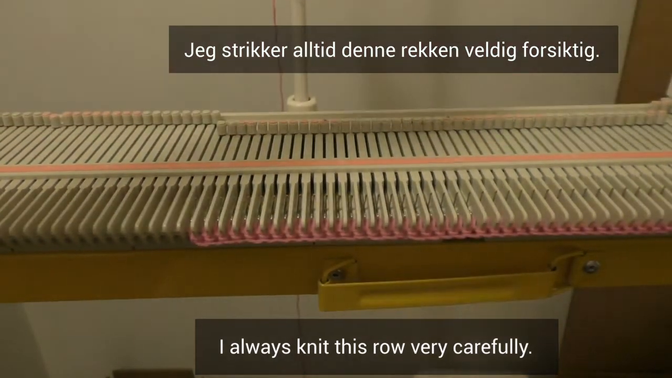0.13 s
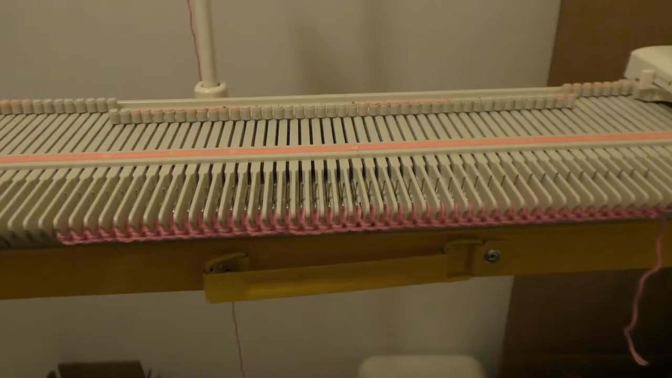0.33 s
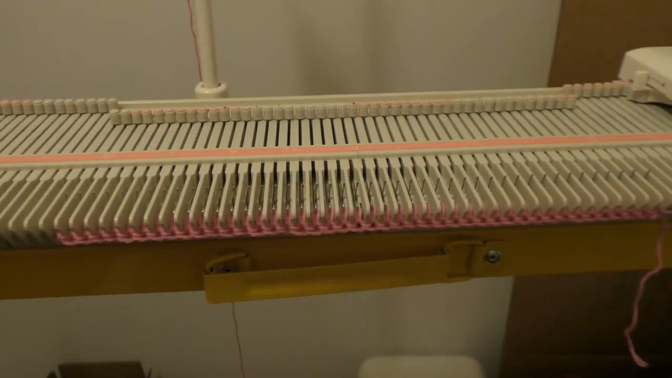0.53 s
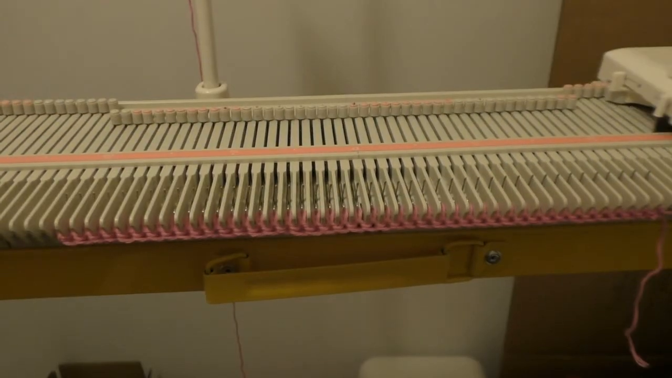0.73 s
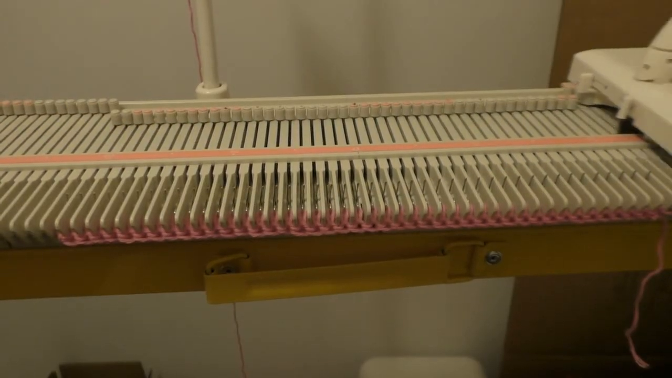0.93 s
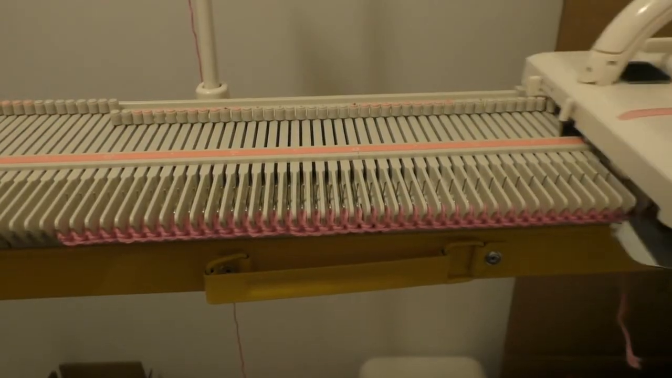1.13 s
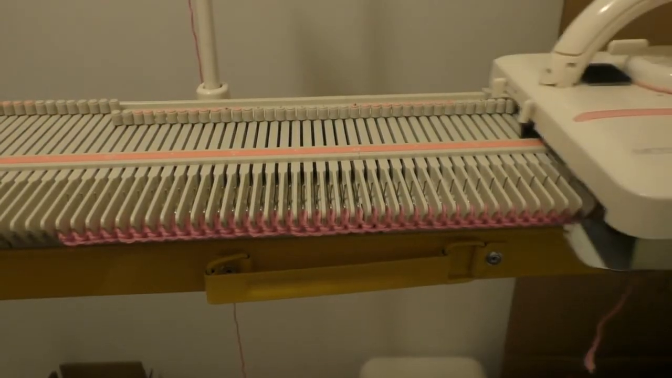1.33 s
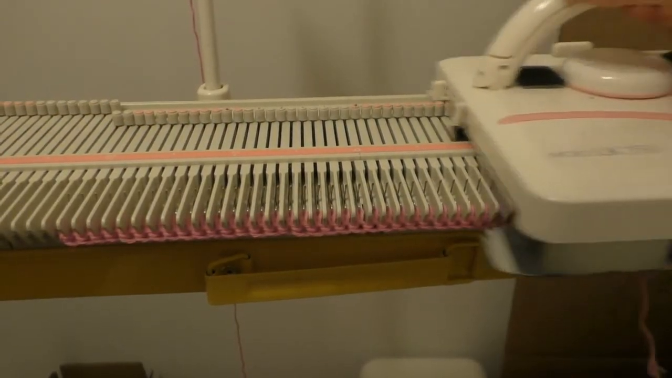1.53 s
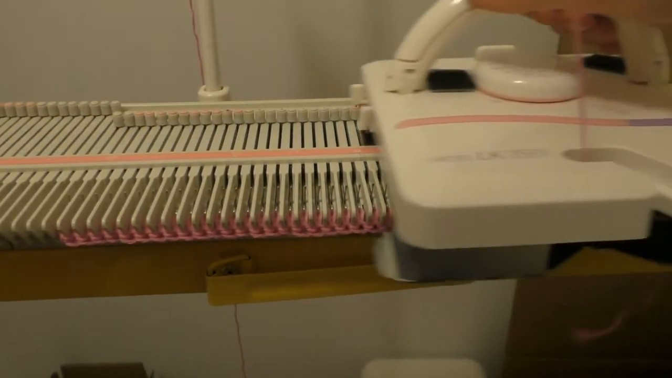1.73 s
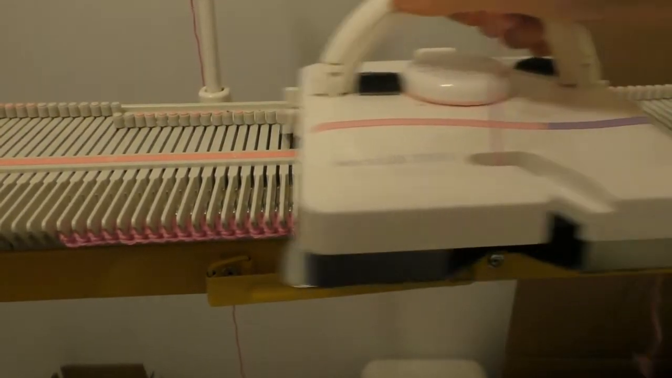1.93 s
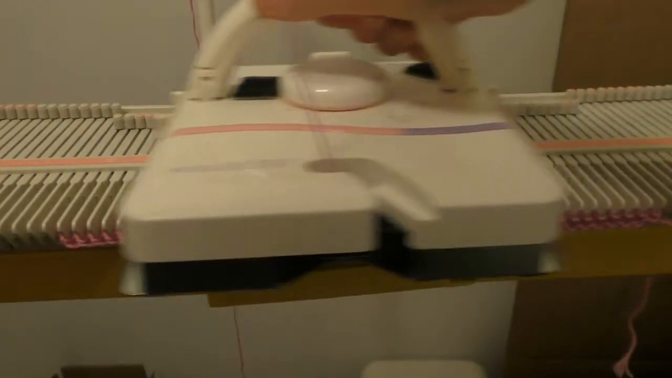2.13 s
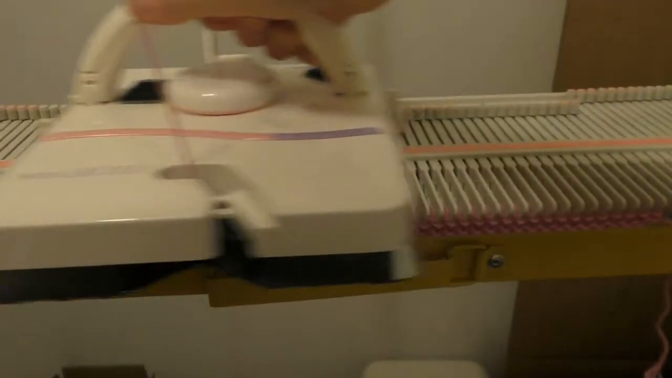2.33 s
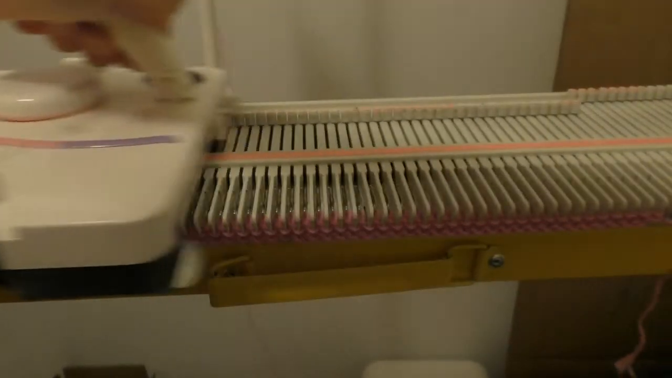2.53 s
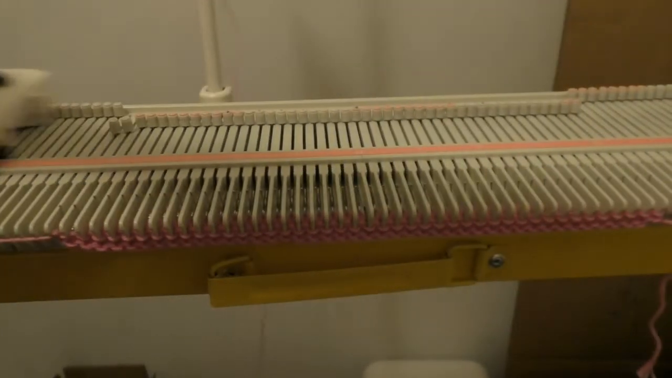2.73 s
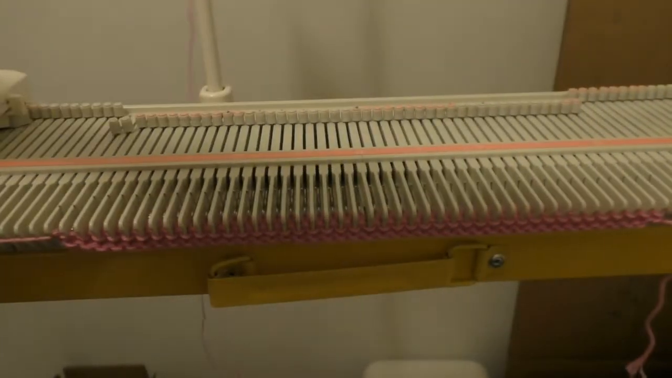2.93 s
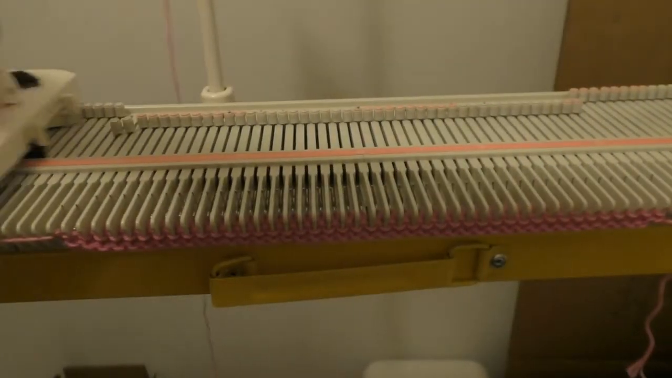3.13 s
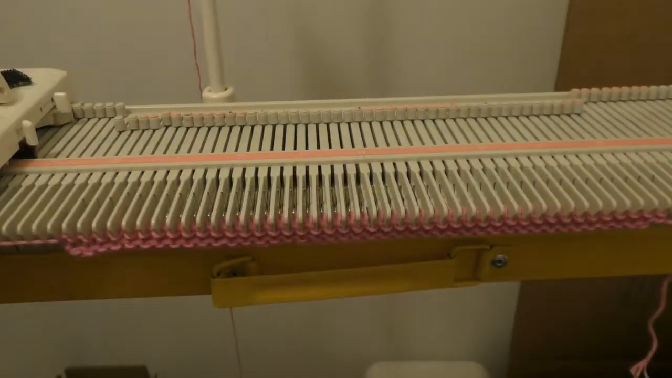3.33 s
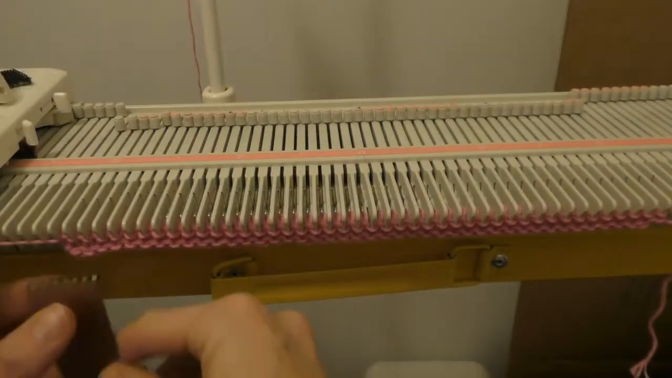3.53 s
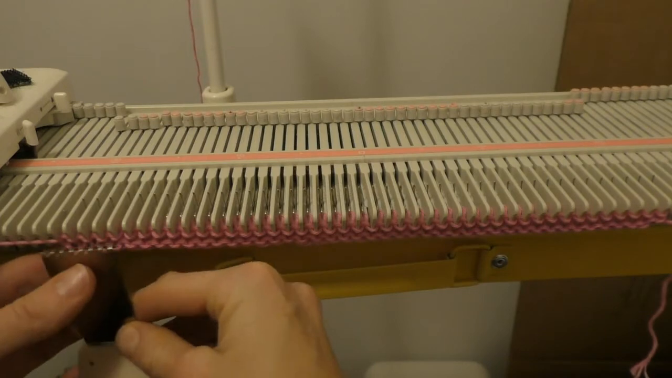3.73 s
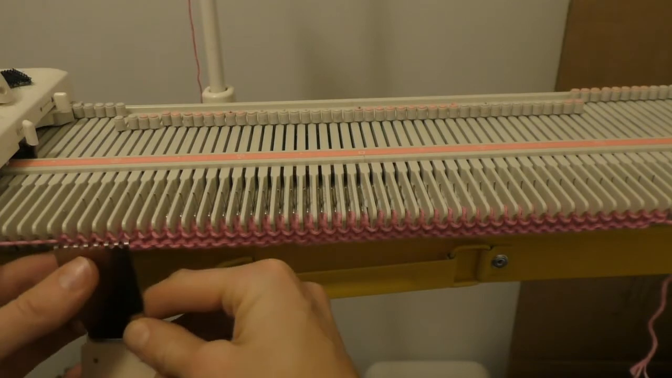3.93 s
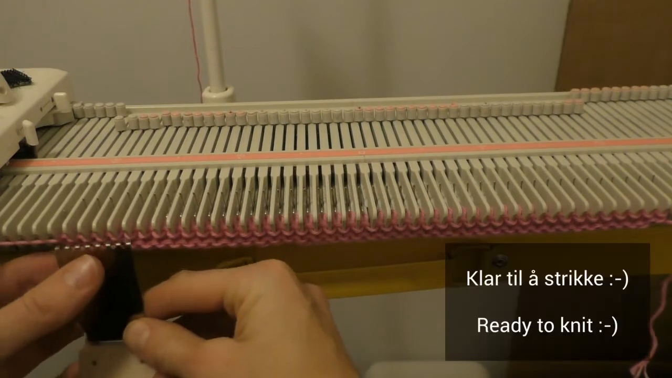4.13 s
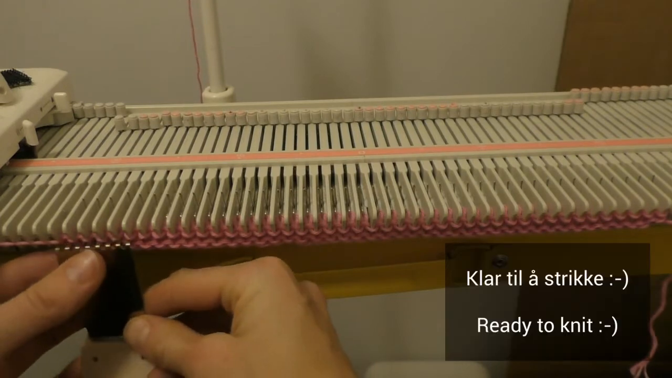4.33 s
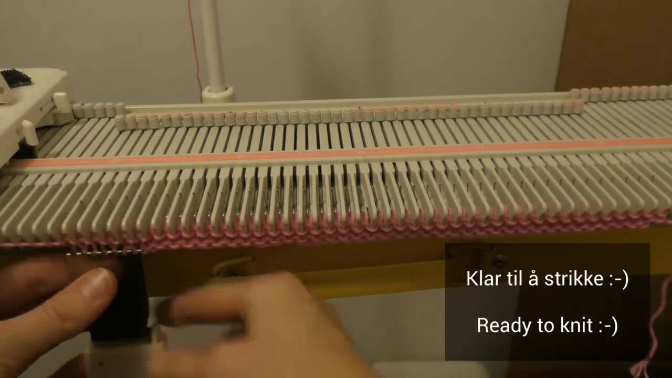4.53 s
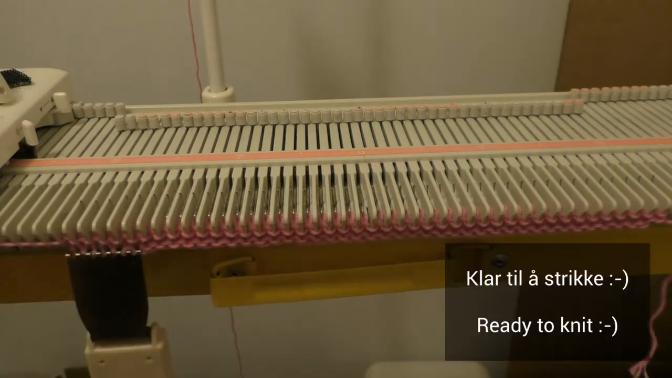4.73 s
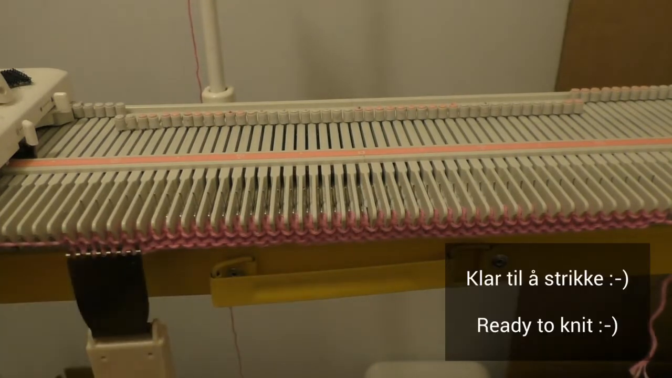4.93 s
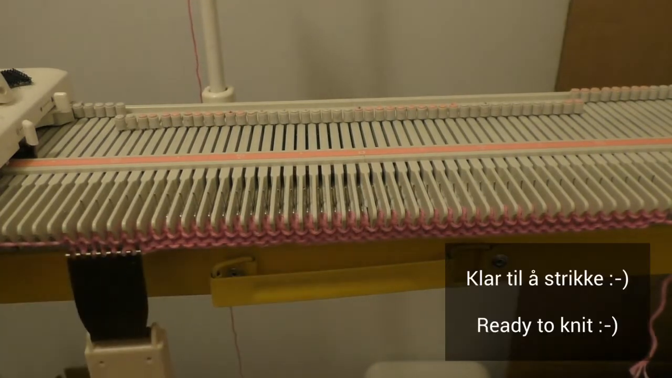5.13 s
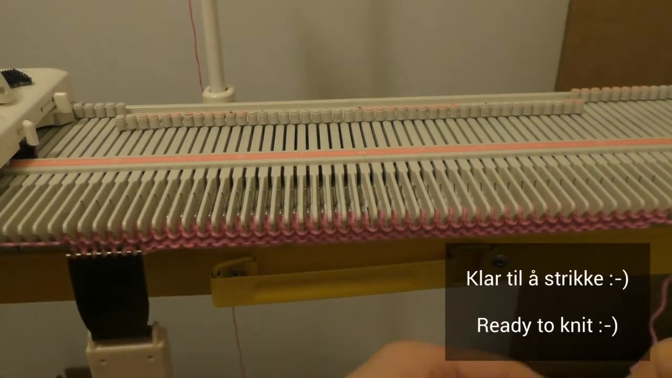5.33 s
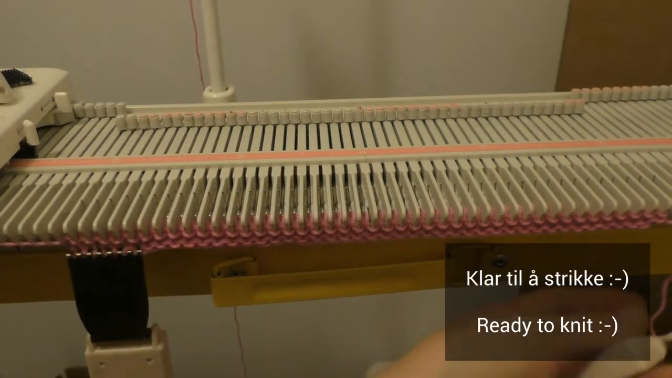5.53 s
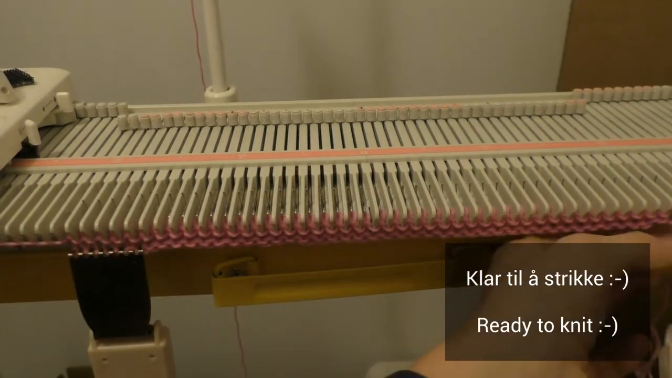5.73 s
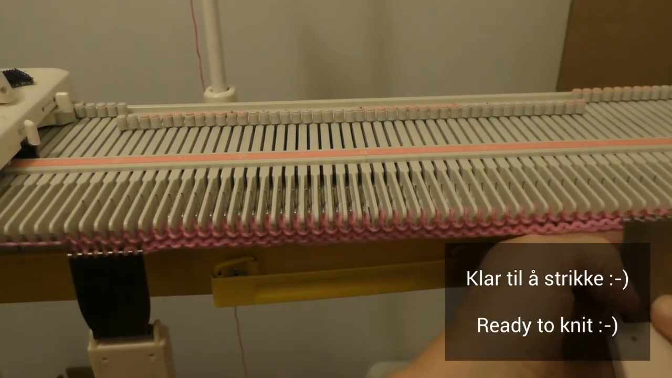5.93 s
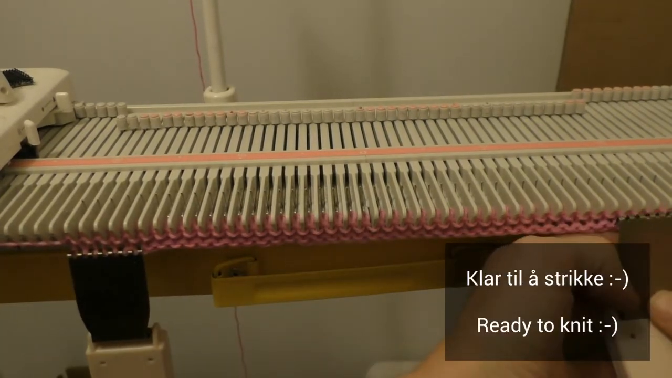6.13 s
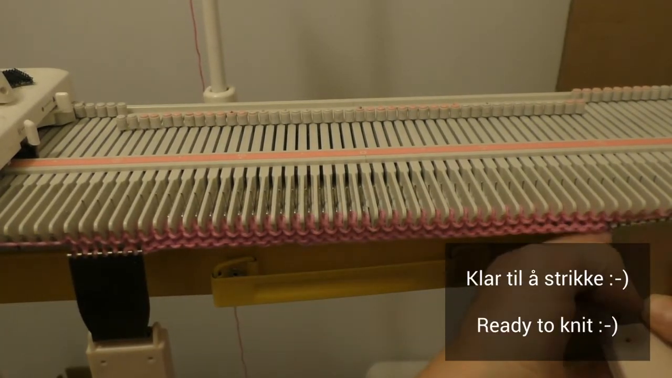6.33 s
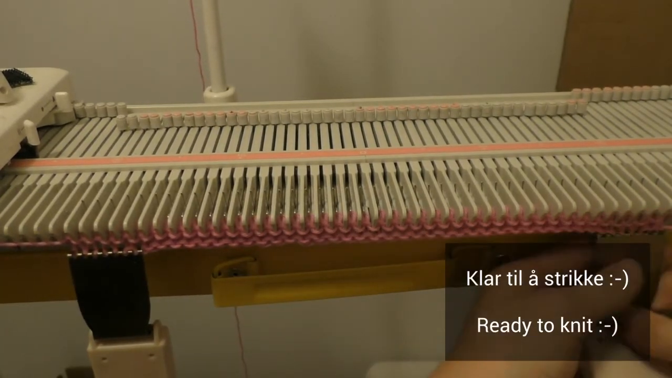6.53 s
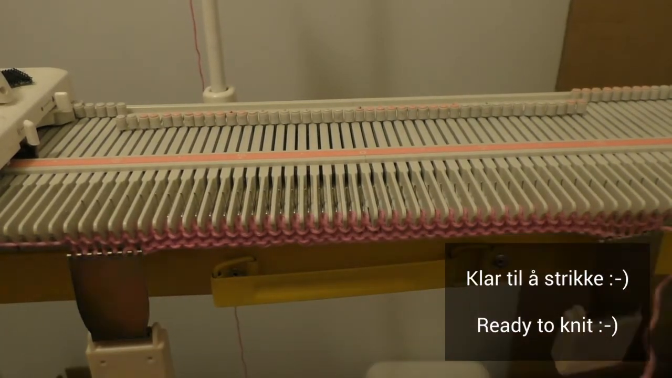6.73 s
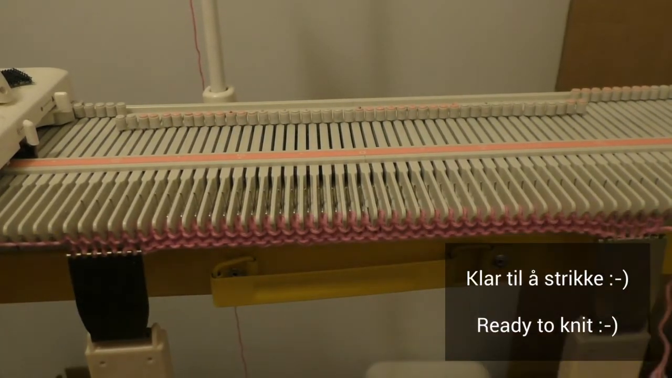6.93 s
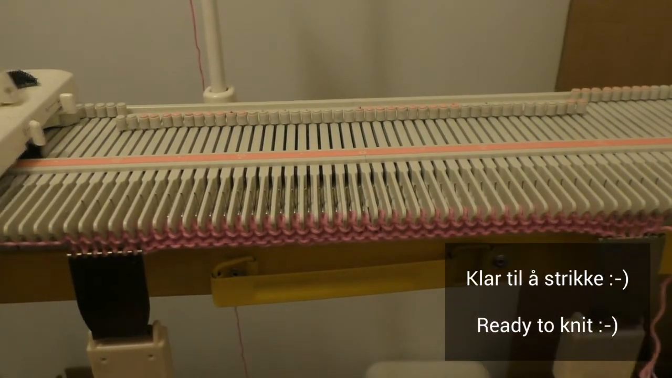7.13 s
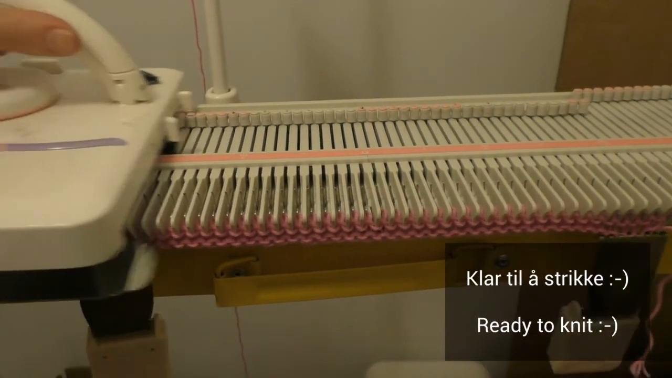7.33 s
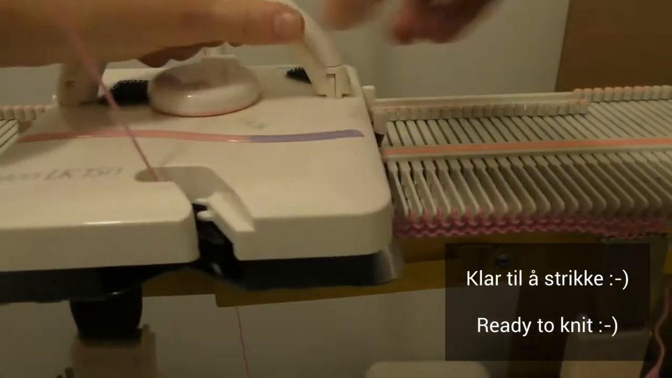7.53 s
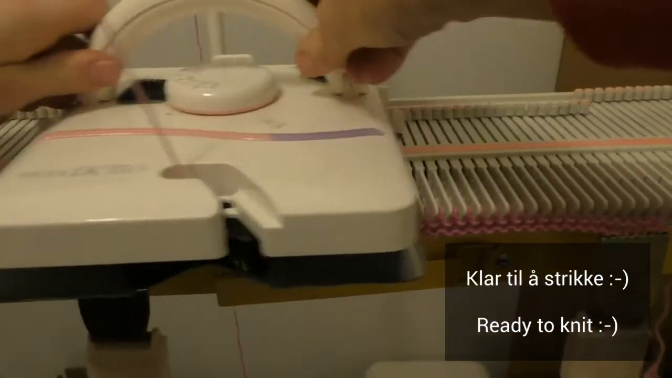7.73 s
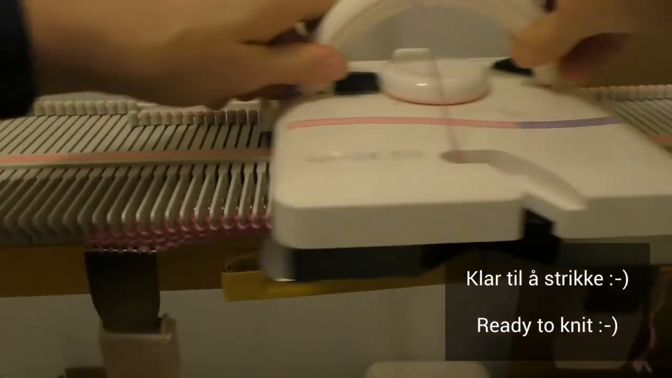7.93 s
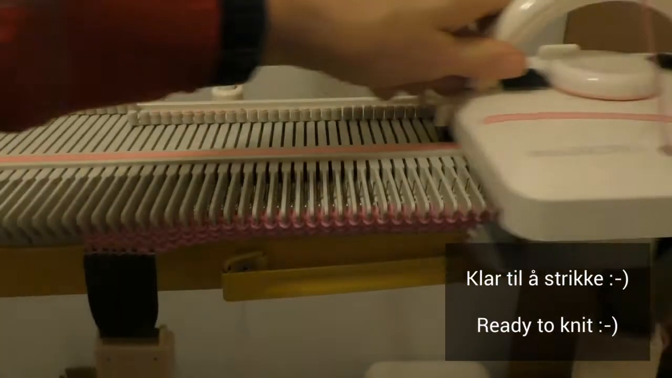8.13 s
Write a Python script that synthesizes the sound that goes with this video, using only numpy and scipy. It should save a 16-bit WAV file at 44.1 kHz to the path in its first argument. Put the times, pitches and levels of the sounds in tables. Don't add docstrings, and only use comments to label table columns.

```python
import sys
import numpy as np
from scipy import signal
from scipy.fft import rfft, irfft, next_fast_len
from scipy.io import wavfile
from scipy.ndimage import minimum_filter1d

SR = 44100
rng = np.random.default_rng(int(sys.argv[2]) if len(sys.argv) > 2 else 0)


def volts_from_decibels(level):
    exponent = np.asarray(level, float) / 20
    return 10 ** exponent


def store_wav(level_fs):
    pcm = np.round(np.clip(np.atleast_2d(level_fs), -1, 1) * 32767)
    wavfile.write(sys.argv[1], SR, pcm.T.astype(np.int16))


N = 364266

# (time [s], level [dB])
PUSHES = [
    [(0.0, -59), (0.38, -58), (0.544, -53), (0.64, -57), (0.75, -54), (0.94, -46.5)],
    [(0.972, -34.5), (1.032, -31.5), (1.082, -43), (1.15, -42.5), (1.2, -41.5), (1.29, -37.5),
     (1.506, -26.5), (1.616, -31), (1.78, -30.5)],
    [(1.87, -27), (2.12, -30), (2.364, -26), (2.42, -28), (2.52, -39.5), (2.558, -30.5), (2.6, -39),
     (2.7, -54), (2.94, -80)],
    [(2.945, -60), (3.176, -55), (3.246, -70.5), (3.342, -55), (3.6, -70), (3.7, -75)],
    [(7.2, -67), (7.29, -41), (7.324, -27), (7.44, -29), (7.494, -38), (7.535, -55), (7.66, -49.5)],
    [(7.672, -44), (7.694, -29), (7.786, -25.5), (7.87, -28.5), (7.972, -32.5), (8.076, -27), (8.196, -43),
     (8.26, -37)],
]
# (time [s], needles passed [count])
TRAVEL = [
    [(1.0925, 0), (1.1604, 1), (1.271, 3), (1.318, 4), (1.4233, 7), (1.4777, 9), (1.524, 11), (1.5864, 14),
     (1.7171, 18)],
    [(1.7615, 0), (1.8034, 1), (1.8348, 2), (1.8822, 4), (2.0528, 13), (2.1132, 15), (2.2479, 21),
     (2.3247, 25), (2.4222, 30)],
    [(7.3191, 0), (7.3999, 4), (7.4398, 6), (7.4892, 8)],
    [(7.6903, 0), (7.7406, 3), (7.8639, 9), (7.9162, 11), (7.9896, 13), (8.0225, 14), (8.0694, 16),
     (8.1115, 18)],
]
# (frequency [Hz], level [dB], T60 [s])
NEEDLE_MODES = [(4100, -21, .02), (6150, -18, .018), (8450, -14, .02), (9300, -17, .015),
                (10700, -17, .016), (11350, -12, .025)]
# (time [s], peak [dB])
STICKS = [(1.318, -26), (1.39, -27), (1.5244, -20), (1.587, -24), (1.651, -24), (1.7617, -21), (1.975, -22),
          (2.1591, -22), (7.439, -18), (7.4905, -27)]
# (time [s], peak [dB], steel share [dB])
CLACKS = [(0.0777, -20, -18), (0.8231, -17.5, -10.5), (0.8816, -26.5, 0.5), (0.962, -26, 3),
          (0.9714, -4, -20), (1.0037, -9.5, -17), (1.272, -10, -38), (1.477, -11, 1.5), (1.633, -14, -20),
          (1.73, -11, -2), (1.834, -11, -30), (2.5025, -11, -17), (2.53, -13, -16), (2.5425, -18, -2),
          (2.5576, -5, -18), (2.615, 1, -15.5), (2.7274, -22, -34), (7.1122, -40, -23), (7.2099, -5.5, -8),
          (7.376, -11, -23), (7.557, -24.5, -37), (7.5924, -29, -18), (7.5998, -19, -13.5),
          (7.6787, -3, -42), (7.741, -11, -8), (8.1133, -11, -32), (8.162, -11, -24), (8.1791, -20, 4.5),
          (8.2396, -21, -15)]
# (time [s], peak [dB], steel share [dB])
KNOCKS = [(0.52, -35, -4), (2.9482, -32, -28), (3.3343, -46.5, 14), (4.3807, -34, -11),
          (4.7675, -24.5, -0.5), (5.1945, -40, -22), (5.3293, -34, 10.5), (5.3372, -31, 4.5),
          (5.591, -26.5, 2.5), (5.614, -40, 12), (6.3722, -31, -21), (6.4806, -29, -18)]
# (time [s], hold [s], level [dB], fall [dB/s], steel share [dB])
JOLTS = [(0.07, .01, -47, 58, -9.5), (1.08, 0.004, -39, 243, -2), (1.158, 0.035, -37.5, 100, -3),
         (2.619, .01, -35, 121, -9.5), (4.368, 0.013, -52, 140.5, -6.5), (4.55, 0.18, -69.5, 102, -6.5),
         (4.76, 0.0043, -44, 245, -7), (4.83, .01, -58, 29, -6), (5.268, 0.29, -61, 94.5, 1),
         (5.548, 0.069, -58.5, 172.5, 6.5), (5.65, .01, -68, 43, -3.5), (6.255, .02, -66, 80, -18),
         (6.378, .01, -63, 398, -7), (6.465, 0.026, -50, 280, -7), (6.56, 0.9, -70, 100, -4),
         (7.099, .03, -45, 67, -8.5), (7.203, .005, -31, 170, -2)]
# (frequency [Hz], density [dB/Hz])
SHELL_SPECTRUM = [(290, -52), (500, -22), (611, -25.5), (913, -11.5), (1260, 1.5), (1490, -4), (1810, 1.5),
                  (2000, -0.5), (2980, -1.5), (4680, -5), (5500, -6), (7150, -36), (12100, -120)]
# (frequency [Hz], density [dB/Hz])
STEEL_SPECTRUM = [(2350, -30), (4000, 0), (4680, -2), (6180, -2), (7190, 0), (8500, -1), (10700, -8),
                  (11200, -2), (12900, -11), (14100, -7), (16000, -18)]
# (frequency [Hz], width [Hz], level [dB])
SHELL_MODES = [(954, 54, -20.5), (1250, 100, -15), (1800, 140, -9), (2266, 170, -10), (2680, 250, -15),
               (3200, 270, -14), (4070, 380, -12.5)]
# (frequency [Hz], width [Hz], level [dB])
STEEL_MODES = [(6270, 600, -25.5), (6820, 150, -20.5), (8000, 150, -34), (9200, 750, -22), (9800, 660, -13),
               (10380, 270, -16.5), (11650, 230, -25.5)]
# (frequency [Hz], width [Hz], level [dB])
CLAW_MODES = [(2410, 49, -2.5), (3000, 46, 4), (3170, 130, 3.5), (4100, 120, 1), (4500, 200, -25),
              (6020, 67, -1), (9670, 310, -2.5), (10270, 250, -8), (11500, 230, -13), (14500, 1100, -5)]
# (time [s], length [s], level [dB], box mode [Hz], upper mode [Hz], upper level [dB])
SHOVES = [(4.77, 0.061, -43, 365, 1250, -9), (4.862, 0.048, -46.5, 350, 1080, -16),
          (5.19, 0.062, -47, 374, 1030, -0.5), (5.251, 0.049, -42, 390, 1010, -10),
          (6.251, 0.0405, -51.5, 151.5, 296, -28), (6.287, 0.035, -45, 81, 200, -40),
          (6.476, 0.021, -45.5, 109, 300, -17)]
# (time [s], length [s], level [dB], frequency [Hz], width [Hz])
RUBS = [(0.075, 0.054, -54, 1800, 392), (0.407, 0.0081, -47.5, 2490, 1500), (0.517, 0.028, -54, 3200, 2000),
        (0.709, 0.16, -53.5, 1910, 1480), (2.718, 0.046, -43.5, 1190, 414),
        (3.158, 0.012, -52.5, 12000, 3000), (3.299, 0.0088, -52, 4870, 4000),
        (3.334, 0.0072, -42.5, 4830, 1000), (5.37, 0.011, -43, 10600, 6000), (4.375, 0.097, -65, 2150, 995),
        (5.198, 0.087, -61.5, 1370, 895), (5.253, 0.049, -46, 770, 510), (5.246, 0.089, -66, 1800, 1200),
        (5.227, 0.097, -62, 3220, 150), (5.541, 0.047, -55, 4200, 400), (5.543, 0.027, -60, 6100, 300),
        (5.593, 0.046, -53, 4500, 1007), (6.458, 0.075, -59, 2500, 3970), (7.225, 0.014, -26, 2070, 1500),
        (7.603, 0.019, -46, 5000, 2000)]
# (time [s], level [dB], frequency [Hz], T60 [s])
TAPS = [(2.6144, -11.5, 1780, 0.017), (2.616, -12, 2400, 0.023), (2.6156, -18.5, 2740, 0.033),
        (2.948, -41, 960, 0.044), (6.575, -63, 4400, 0.18), (0.48, -38.5, 480, 0.014),
        (1.232, -33.5, 1000, .03), (7.212, -17, 1720, 0.026), (7.213, -19, 2930, 0.026),
        (5.38, -59, 4370, 0.51)]
# (time [s], hold [s], table level [dB], stand level [dB])
THUDS = [(0.0, 0.28, -59, -59), (0.937, 0.044, -55.5, -48), (3.29, 0.11, -58.5, -62),
         (3.585, 0.018, -58.5, -59.5), (3.672, 0.032, -58, -54), (4.277, 0.031, -57, -59.5),
         (4.707, .04, -55.5, -70), (4.757, .03, -47.5, -63), (4.82, 0.18, -54.5, -55),
         (5.186, 0.097, -52, -68), (5.338, 0.22, -59.5, -52), (5.709, 0.016, -60.5, -58),
         (6.264, 0.036, -52, -43), (6.46, 0.031, -49.5, -41), (6.88, 0.043, -65.5, -53.5),
         (7.262, 0.08, -43, -52.5), (7.471, 0.042, -50, -51), (7.844, .07, -58, -51),
         (8.04, 0.046, -51, -56)]
# (frequency [Hz], density [dB/Hz])
TABLE_SPECTRUM = [(24, -50), (40, -17.5), (145, 4.5), (204, -2), (359, 0), (476, -7), (601, -22),
                  (750, -13.5), (980, -39), (1650, -120)]
# (time [s], left-right difference [dB])
PLACE = [(0.0, -1.5), (1.27, -3), (2.87, 2.5), (4.32, 4), (4.71, -2), (5.54, -4.5), (6.17, 1.5),
         (6.39, -1.5), (7.04, 3.0), (8.26, -2.5)]
# (frequency [Hz], density [dB/Hz])
AIR_SPECTRUM = [(15, -37), (25, -1), (117, 1), (293, -0.5), (439, -6.5), (607, -13.5), (796, -13.5),
                (1190, -8), (1440, -14.5), (3620, -24), (5730, -30), (13200, -29.5), (14800, -26),
                (16000, -33)]

FULL_PUSH_DB = -30
THUD_RISE_S = 0.0081


def carriage():
    push_db = effort()
    shell = volts_from_decibels(push_db)
    steel = volts_from_decibels(push_db + 0.15 + 0.23 * (push_db - FULL_PUSH_DB))
    for s, hold_s, db, fall_db_per_s, share_db in JOLTS:
        jolt = volts_from_decibels(db) * burst(s, hold_s, 0.0074, fall_db_per_s)
        shell = np.hypot(shell, jolt)
        steel = np.hypot(steel, volts_from_decibels(share_db) * jolt)
    stick_steel_db = 8
    knocks = CLACKS + KNOCKS + [(s, db, stick_steel_db) for s, db in STICKS]
    s, peak_db, share_db = np.transpose(knocks)
    snap_s, snap_db = snaps()
    shell_blows = blows(s, peak_db - 23.5, 0.0042) + blows(snap_s + .003, snap_db - 19, 0.0055)
    steel_blows = blows(s, peak_db + share_db - 11.0, 0.0023) + blows(snap_s, snap_db - 19.5, 0.002)
    shell = volts_from_decibels(-8) * shell * (0.45 + grains(900, 1.9, 0.014))
    steel = volts_from_decibels(-6.5) * steel * (0.49 + grains(1500, 2.3, 0.0058))
    steel = sounding(steel, steel_blows, STEEL_SPECTRUM, STEEL_MODES, 4500, 16500, -13.5, 7)
    steel = steel - .5 * resonance(steel, 7300, 1100) + .45 * resonance(steel, 11350, 600)
    shell = sounding(shell, shell_blows, SHELL_SPECTRUM, SHELL_MODES, 560, 4890, -9.5, 4.8)
    return shell + steel + needles(snap_s, snap_db)


def effort():
    return in_time(sum(PUSHES, []))[0]


def snaps():
    base_db, db_per_wait_doubling, spread_db, jitter_s = 9.5, 6, 2, .0008
    runs = [np.interp(np.arange(run[-1][1] + 1), *np.transpose(run)[::-1]) for run in TRAVEL]
    s = np.concatenate(runs)
    wait_s = np.concatenate([np.gradient(run) for run in runs])
    luck = rng.standard_normal((len(s), 2))
    db = effort()[(s * SR).astype(int)] + base_db
    db = db + db_per_wait_doubling * np.log2(wait_s * 50) + spread_db * luck[:, 0]
    return s + jitter_s * luck[:, 1], np.minimum(db, -11)


def needles(s, peak_db):
    luck = rng.standard_normal((len(s), 2 * len(NEEDLE_MODES)))
    out = np.zeros((2, N))
    for k, (hz, db, t60_s) in enumerate(NEEDLE_MODES):
        heights = panned(volts_from_decibels(peak_db + db + 3 * luck[:, 2 * k]), 4 * luck[:, 2 * k + 1])
        for kind, detune in enumerate((.99, 1, 1.01)):
            clicks = np.zeros((2, N))
            clicks[:, (s[kind::3] * SR).astype(int)] = heights[:, kind::3]
            out += ring(clicks, detune * hz, t60_s)
    return out


def weights():
    grit = rng.standard_normal(N) * (2.2 + grains(601, 2.3, 0.002))
    return claw(grit) + shoves(grit) + rubs(grit) + taps()


def claw(grit):
    start_s, length_s, damping_s = 5.331, .047, 0.038
    steel = sum(volts_from_decibels(db) * rms_one(resonance(grit, hz, width_hz)) for hz, width_hz, db in CLAW_MODES)
    damping = np.exp(-np.clip(np.arange(N) / SR - start_s, 0, 1) / damping_s)
    return volts_from_decibels(-40.5) * steel * gate(start_s, length_s, 0.0086) * damping


def shoves(grit):
    out = np.zeros(N)
    for s, length_s, db, box_hz, upper_hz, upper_db in SHOVES:
        box = narrow(grit, box_hz, 0.3 * box_hz, box_hz)
        upper = narrow(grit, upper_hz, 0.2 * upper_hz, upper_hz)
        out += volts_from_decibels(db) * (box + volts_from_decibels(upper_db) * upper) * gate(s, length_s, 0.003)
    return out


def rubs(grit):
    out = np.zeros(N)
    for s, length_s, db, hz, width_hz in RUBS:
        out += volts_from_decibels(db) * narrow(grit, hz, width_hz, 2 * width_hz) * gate(s, length_s, 0.0043)
    return out


def taps():
    out = np.zeros(N)
    for s, db, hz, t60_s in TAPS:
        click = np.arange(N) == round(s * SR)
        out += volts_from_decibels(db) * resonance(ring(click, hz, t60_s), hz, hz / 2)
    return out


def table():
    push_db = minimum_filter1d(effort(), size=SR // 25) - FULL_PUSH_DB
    top = np.hypot(volts_from_decibels(-72.5) * duck() * grains(9, 3.0, .04), volts_from_decibels(-50 + .55 * push_db))
    legs = np.hypot(volts_from_decibels(-67) * duck(), volts_from_decibels(-66.5 + 0.23 * push_db))
    for s, hold_s, top_db, legs_db in THUDS:
        thud = burst(s, hold_s, THUD_RISE_S, 219)
        top = np.hypot(top, volts_from_decibels(top_db) * thud)
        legs = np.hypot(legs, volts_from_decibels(legs_db) * thud)
    lumps = 2 + grains(90, 2.0, .012)
    rumble = rms_one(colour(lumps * wide_noise(-12.0), TABLE_SPECTRUM, 90, 700))
    shudder = signal.sosfilt(signal.butter(2, [55, 105], "band", fs=SR, output="sos"), wide_noise(-5.5))
    return table_note() + top * rumble + volts_from_decibels(-8.0) * legs * rms_one(shudder)


def table_note():
    hz, t60_s, ring_db = 140.4, .12, 4.5
    s, _, top_db, _ = np.transpose(THUDS)
    clicks = blows(s + THUD_RISE_S, top_db + ring_db, 1 / SR)
    return resonance(ring(clicks, hz, t60_s), hz, hz)


def room(x):
    t60_s, wall_cut_hz = 0.24, 7800
    size = next_fast_len(N + SR)
    turn = np.exp(-2j * np.pi * np.arange(size // 2 + 1) / size)
    dull = np.exp(-2 * np.pi * wall_cut_hz / SR)
    absorption = 1 - .4 + .4 * (1 - dull) / (1 - dull * turn)
    walls = np.zeros((2, len(turn)), complex)
    for k, lag in enumerate((rng.uniform(.012, .06, size=32) * SR).astype(int)):
        loop = volts_from_decibels(-60 * lag / SR / t60_s) * absorption * turn ** lag
        walls[k % 2] += loop / (1 - loop) * (-1) ** (k // 2)
    return irfft(walls * rfft(x, size), size)[:, :N]


def still_air():
    air = volts_from_decibels(-59.5) * rms_one(colour(wide_noise(-0.098), AIR_SPECTRUM, 21.73, 16500))
    hiss = signal.sosfilt(signal.butter(2, 9000, "high", fs=SR, output="sos"), wide_noise(0))
    return duck() * (air + volts_from_decibels(-84) * hiss)


def duck():
    share, from_db, release_db_per_s = 0.15, -51.5, 40
    ramp_db = release_db_per_s * np.arange(N) / SR
    held_db = np.maximum.accumulate(effort() + ramp_db) - ramp_db
    return volts_from_decibels(-share * np.clip(held_db - from_db, 0, 99))


def sounding(steady, sudden, spectrum, modes, low_hz, high_hz, side_db, ring_db):
    norm = np.linalg.norm(colour(np.eye(1, 4096)[0], spectrum, low_hz, high_hz))
    out = colour((steady + sudden) * wide_noise(side_db), spectrum, low_hz, high_hz) / norm
    for hz, width_hz, db in modes:
        struck = (steady * grains(150, 4.2, 0.0045) + volts_from_decibels(ring_db) * sudden) * wide_noise(side_db)
        out += volts_from_decibels(db) * resonance(struck, hz, width_hz) * np.sqrt(SR / np.pi / width_hz)
    return out


def grains(per_s, spread_db, decay_s):
    sizes = volts_from_decibels(spread_db * np.minimum(rng.exponential(1, N), 4))
    return rms_one(fade(sizes * (rng.random(N) < per_s / SR), decay_s))


def blows(s, db, decay_s):
    clicks = np.zeros(N)
    clicks[(s * SR).astype(int)] = volts_from_decibels(db)
    return fade(clicks, decay_s)


def burst(start_s, hold_s, rise_s, fall_db_per_s):
    out, first = np.zeros(N + SR), int(start_s * SR)
    t = np.arange(SR) / SR
    fall = volts_from_decibels(-fall_db_per_s * np.clip(t - rise_s - hold_s, 0, 1))
    out[first:first + SR] = (np.clip(t / rise_s, 0, 1) * fall)[:N + SR - first]
    return out[:N]


def gate(start_s, length_s, edge_s):
    t = np.arange(N) / SR - start_s
    return np.clip(np.minimum(t, length_s - t) / edge_s, 0, 1)


def fade(clicks, decay_s):
    return signal.lfilter([1], [1, -np.exp(-1 / (decay_s * SR))], clicks + 1e-18)


def ring(x, hz, t60_s):
    r, w = volts_from_decibels(-60 / (t60_s * SR)), 2 * np.pi * hz / SR
    return signal.lfilter([0, np.sin(w)], [1, -2 * r * np.cos(w), r * r], x + 1e-18)


def resonance(x, hz, width_hz):
    r = np.exp(-np.pi * width_hz / SR)
    poles = [1, -2 * r * np.cos(2 * np.pi * hz / SR), r * r]
    return signal.lfilter([(1 - r * r) / 2, 0, (r * r - 1) / 2], poles, x)


def narrow(x, hz, width_hz, skirt_hz):
    return rms_one(resonance(resonance(x, hz, width_hz), hz, skirt_hz))


def colour(x, points, low_hz, high_hz):
    edges = np.geomspace(low_hz, high_hz, round(3 * np.log2(high_hz / low_hz)) + 1)
    hz, db = np.transpose(points)
    gains = volts_from_decibels(np.interp(np.log(edges[1:] * edges[:-1]) / 2, np.log(hz), db))
    out = 0
    for k, gain in enumerate(gains):
        band = signal.butter(2, edges[k:k + 2], "band", fs=SR, output="sos")
        out = out + gain * (-1) ** k * signal.sosfilt(band, x)
    return out


def wide_noise(side_db):
    mid, side = rng.standard_normal((2, N))
    return mid + volts_from_decibels(side_db) * side * [[1], [-1]]


def panned(x, pan_db):
    return x * volts_from_decibels(pan_db / 2 * np.array([[1], [-1]]))


def rms_one(x):
    return x / np.sqrt(np.mean(x ** 2) + 1e-20)


def in_time(rows):
    s, *columns = np.transpose(rows)
    return [np.interp(np.arange(N) / SR, s, c) for c in columns]


def scene():
    near = panned(carriage() + weights(), in_time(PLACE)[0])
    return near + volts_from_decibels(-18) * room(near.mean(axis=0)) + table() + still_air()


def roll_off(x):
    return signal.sosfilt(signal.butter(12, 16980, fs=SR, output="sos"), x)


def record(dry):
    side = (dry[0] - dry[1]) / 2
    airy = volts_from_decibels(1.0) * signal.sosfilt(signal.butter(2, 11000, "high", fs=SR, output="sos"), side)
    steep_cut = signal.ellip(10, .5, 55, 15900, fs=SR, output="sos")
    mix = signal.sosfilt(steep_cut, dry + airy * [[1], [-1]])
    return roll_off(mix)


dry = scene()
out = record(dry)
store_wav(out)
```